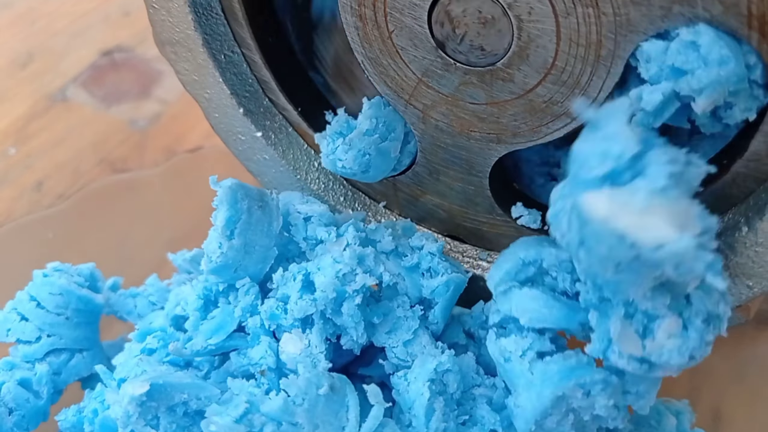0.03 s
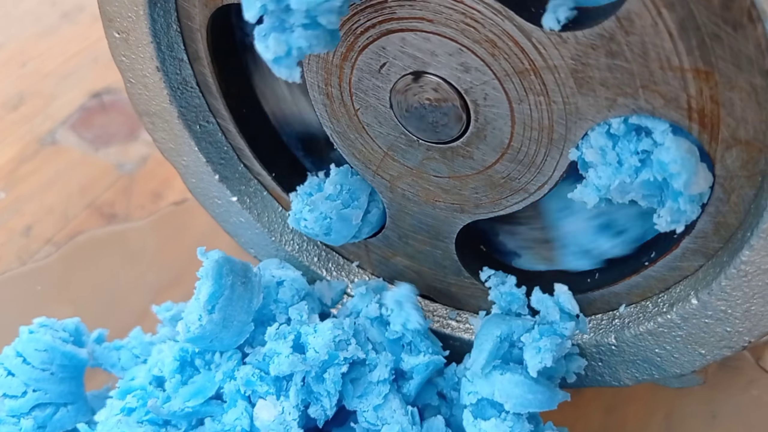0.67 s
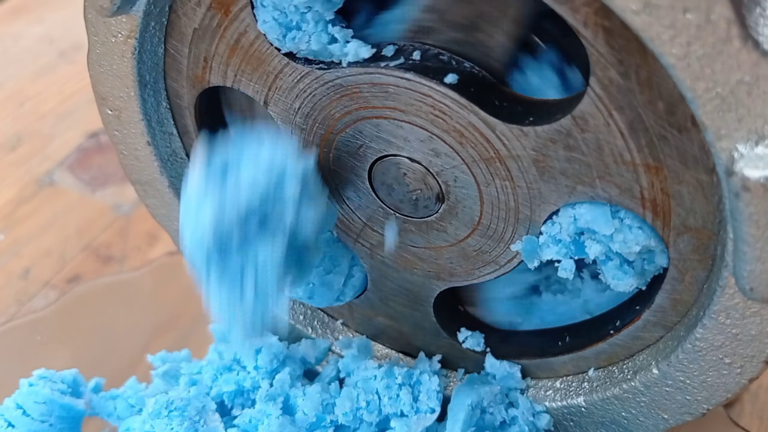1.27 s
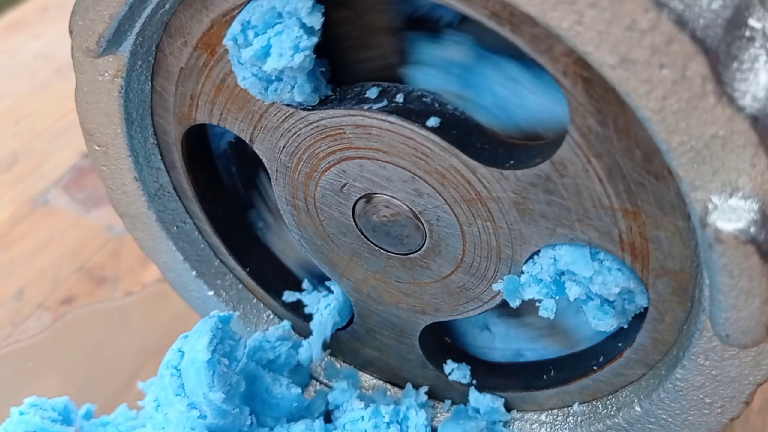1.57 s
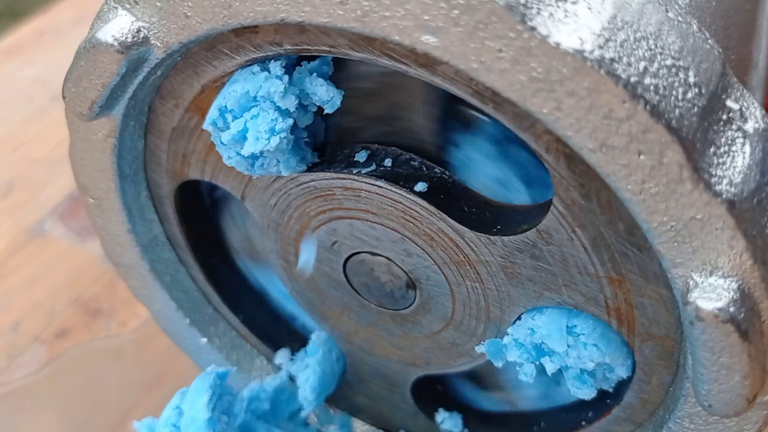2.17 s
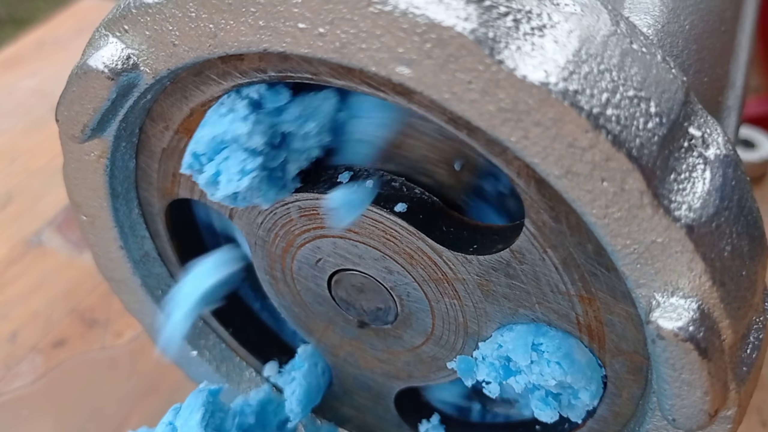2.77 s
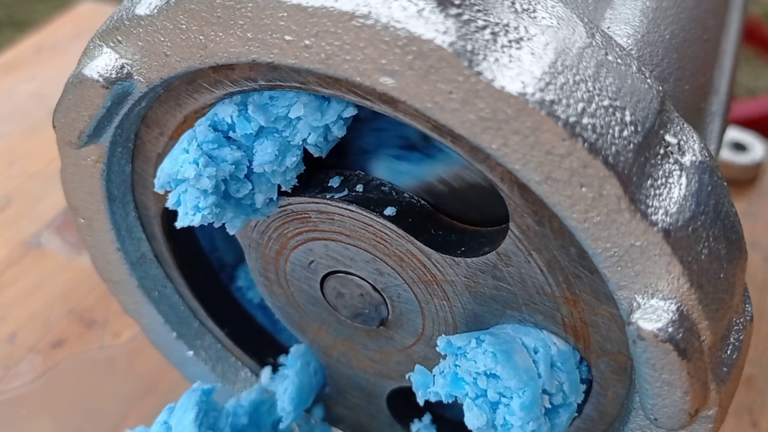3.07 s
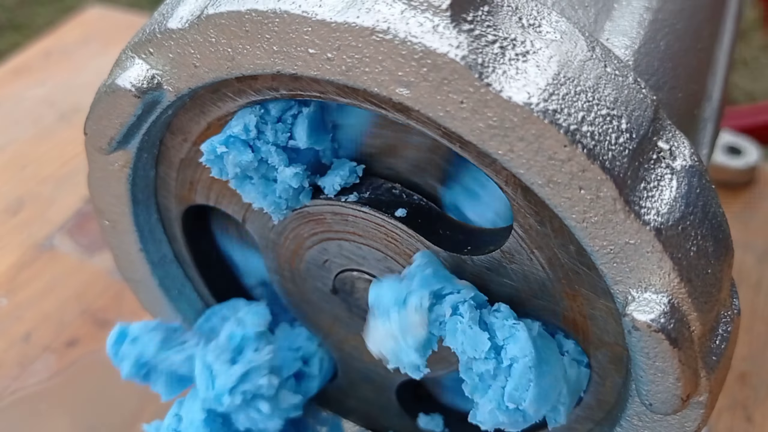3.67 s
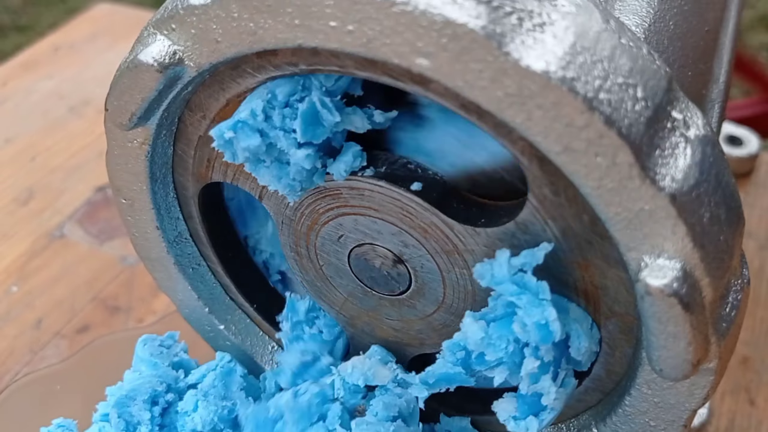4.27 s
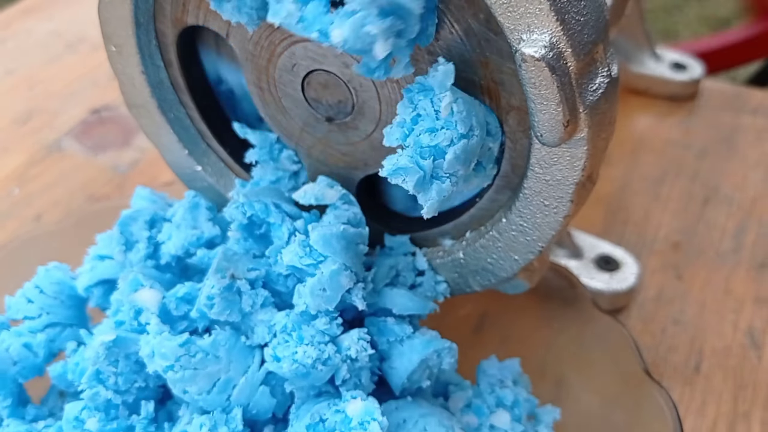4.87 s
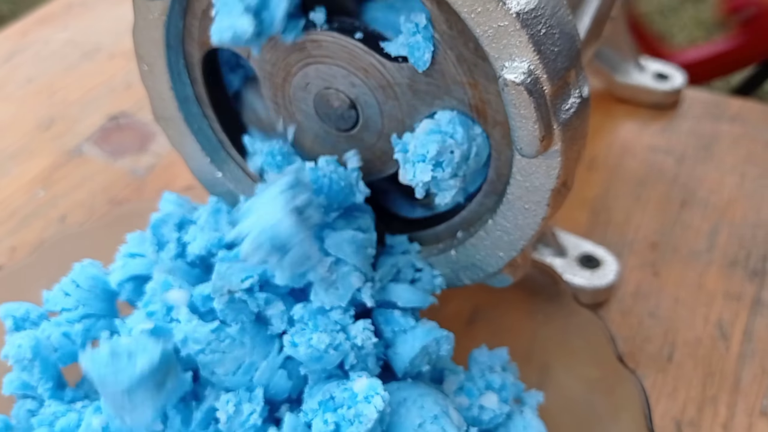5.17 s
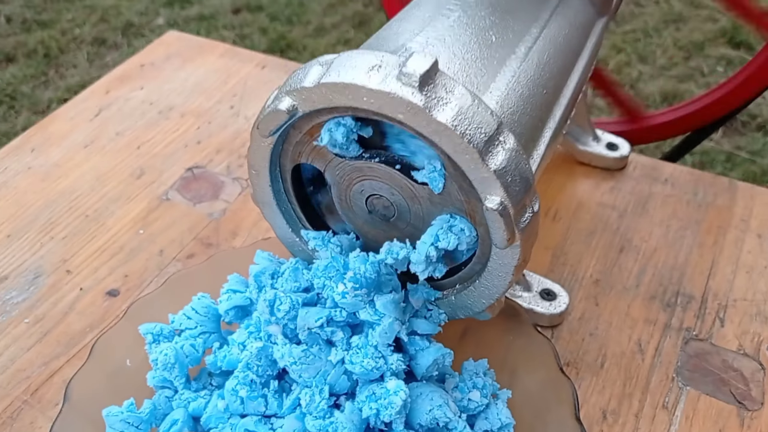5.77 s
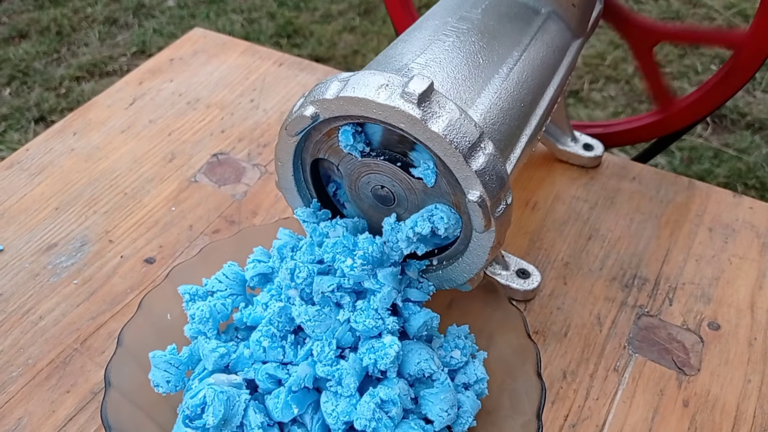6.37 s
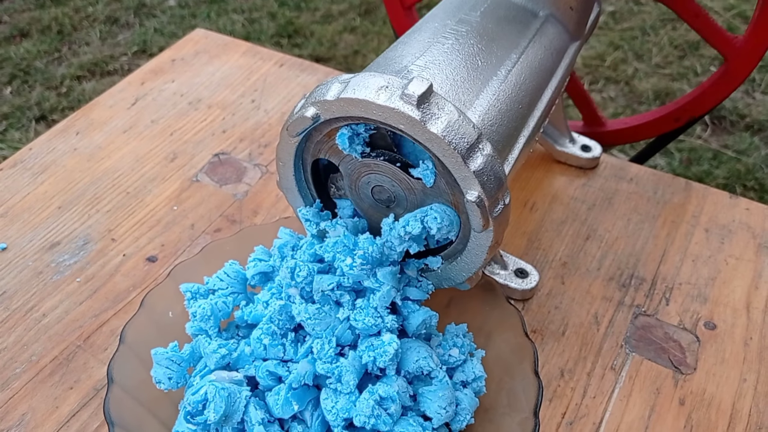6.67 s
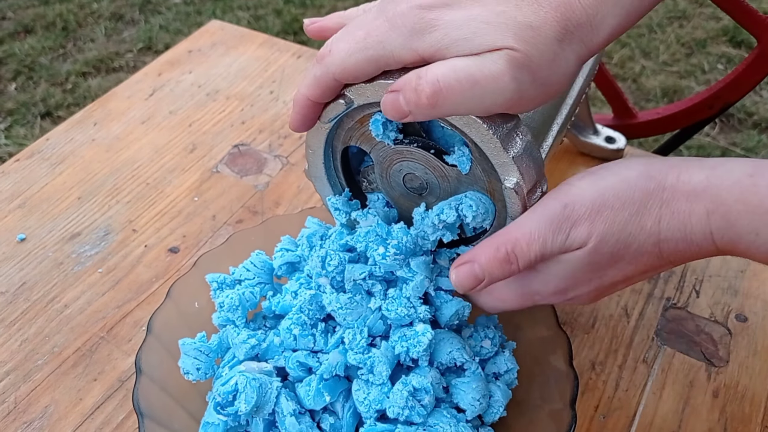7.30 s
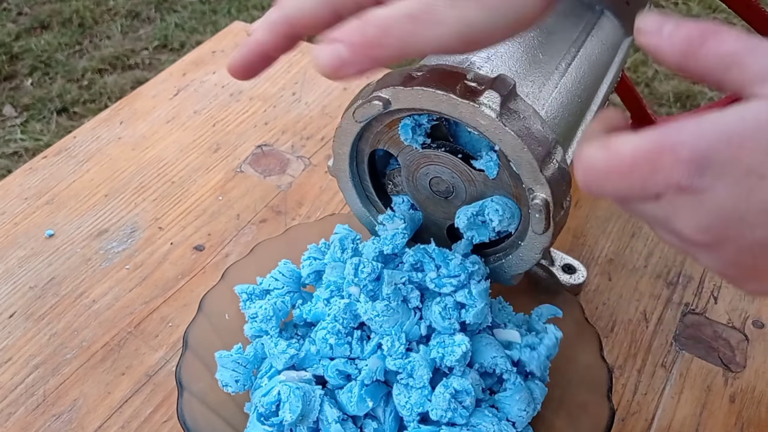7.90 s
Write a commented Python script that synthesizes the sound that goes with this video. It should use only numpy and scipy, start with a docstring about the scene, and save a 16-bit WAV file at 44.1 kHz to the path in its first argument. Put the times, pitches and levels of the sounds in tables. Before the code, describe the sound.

Heard up close in the open air, a meat grinder gives a loud, rattling drone with fast belt ticks, a faint high wavering whine and irregular thuds as it crushes crumbly lumps. After about six seconds a sharp switch click cuts the motor and it winds down at once. A quiet pause follows, then faint finger rubbing, a few small rising squeaks and one clink from the metal ring.

```python
"""A belt-driven meat grinder chews crumbly lumps, heard up close on a wooden table outdoors.
Its gears drone and rattle the frame, the knife rasps on a singing plate, the belt hisses and ticks,
the mass churns and lumps knock in the barrel. A switch snaps and the machine runs down.
Hands then scrape at the head and the pile, and the head's ring squeaks and clinks in the quiet air."""
import sys
import numpy as np
from scipy import signal
from scipy.fft import rfft, irfft
from scipy.io import wavfile
from scipy.ndimage import uniform_filter1d

SR = 44100
rng = np.random.default_rng(int(sys.argv[2]) if len(sys.argv) > 2 else 0)


def store_wav(level_fs):
    """Save 16-bit WAV to argv[1]."""
    pcm = np.round(np.clip(np.atleast_2d(level_fs), -1, 1) * 32767)
    wavfile.write(sys.argv[1], SR, pcm.T.astype(np.int16))


N = 358974
TIME = np.arange(N) / SR
HIT_SIZE = 8192  # samples in a one-shot

# The mix of the running machine. Each row: time in seconds, body level in dB,
# panel buzz against the frame rattle in dB, belt level in dB.
MACHINE_MIX = [(0, -28, -17, -50.5), (0.9, -28, -15, -51.5), (2.4, -29.5, -10.5, -51.5),
               (3.3, -29.5, -14, -53), (4.4, -29, -12, -53.5), (5.6, -31, -12.5, -52.5),
               (6.3, -31.5, -16.5, -54)]
# The gear drone. Each row: multiple of the mesh rate, relative level in dB.
GEAR_TONES = [(4, -9), (5, -13.5), (9, -12.5), (18, -29)]
# The motor hum. Each row: pitch in Hz, relative level in dB.
MOTOR_TONES = [(48.8, -27), (73.3, -17.5), (172, -16.5), (300, -14), (600, -11), (899, -30), (1735, -34)]
# The plate sings, breaks into two rough side tones, then sings out again. Each row: time in seconds,
# pitch in Hz, whine level in dB, distance to the side tones in Hz, their level in dB.
PLATE_SONG = [(0, 2563, -52, 89.7, -57), (1.2, 2552, -53, 90.5, -53.5), (1.8, 2557, -46, 89.7, -64),
              (2.3, 2543, -51.5, 90, -54), (2.75, 2544, -46.5, 89.4, -56), (3.2, 2533, -51, 90, -52),
              (3.95, 2553, -48, 104.2, -52), (4.4, 2560, -48, 114, -52), (4.7, 2580, -55, 139.7, -48),
              (5.3, 2530, -58, 198, -48), (5.5, 2530, -43.5, 178.4, -48), (5.8, 2536, -46, 100.4, -58),
              (5.98, 2548, -41.5, 89.2, -58), (6.24, 2580, -43.5, 70, -46), (6.36, 2540, -45.5, 80, -53.5)]
# The belt's pace under power. Each row: time in seconds, turns per second.
BELT_SPEED = [(0, 4.406), (1.5, 4.431), (2.5, 4.41), (3, 4.35), (3.3, 4.231), (3.7, 4.302), (4.6, 4.354),
              (5.5, 4.34), (6.3, 4.472)]
# Rough spots on the belt. Each row: place in the turn from 0 to 1, relative level in dB.
BELT_SPOTS = [(0, -3), (.048, -16), (.18, -9.5), (.258, -6.5), (.43, -6.5), (.497, -4.5), (.54, -18),
              (.67, -6), (.742, -7), (.93, -9.5)]
# The belt's top end fades as the microphone draws back. Each row: time in seconds, gain in dB.
BELT_TREBLE = [(0, 0.5), (2.6, -1), (3.4, 0.5), (4.6, -1), (5.3, -3.5), (5.9, -11)]
# Lumps caught by the auger. Each row: start in seconds, peak in dB, centre of the blow in Hz,
# crack against the thud in dB, crushing time in seconds.
LUMPS = [(.089, -18.5, 561, -19, 0.073), (.148, -18, 640, -16, .008), (.279, -7, 417, -23, 0.022),
         (.732, -13.5, 493, -26, 0.0097), (.747, -19.5, 897, -10, 0.017), (.794, -16, 136, -26, 0.013),
         (1.038, -19.5, 490, -26, 0.039), (1.075, -17, 168, -22, 0.014), (1.183, -12.5, 683, -10, 0.0073),
         (1.250, -16, 142, -23, 0.012), (1.484, -18.5, 134.6, -25, 0.021), (1.596, -16.5, 910, -19, 0.005),
         (1.728, -20.5, 182.6, -26, 0.034), (1.904, -16, 164.5, -21, 0.033), (1.934, -30, 850, -20, 0.0069),
         (2.110, -7, 524, -18.5, .011), (2.184, -21, 617, -17, 0.018), (2.334, -17.5, 297, -27, 0.014),
         (2.362, -17.5, 577, -12.5, 0.0097), (2.442, -18.5, 197, -25, 0.015), (2.5050, -6, 448, -31, 0.014),
         (2.555, -11.5, 734, -15, 0.0064), (2.630, -20.5, 513, -11, 0.012), (2.768, -7, 627, -11, 0.0076),
         (2.780, -13.5, 170, -25.5, 0.015), (3.005, -17, 505, -34, .016), (3.332, -23, 590, -24, 0.0073),
         (3.702, -19.5, 488, -26, 0.03), (3.722, -23, 700, -7, .012), (4.244, -19, 554, -27, 0.0054),
         (4.415, -16, 463, -34.5, 0.023), (4.669, -17, 234.5, -23, 0.035), (5.084, -15.5, 520, -15, 0.0081),
         (5.146, -17.5, 205, -37, 0.017), (5.180, -21, 602, -24, 0.012), (5.293, -14, 460, -35, 0.017),
         (5.328, -23, 647, -29, 0.011), (5.564, -15.5, 551, -16, 0.027), (5.58, -19, 189.7, -32, 0.042),
         (5.917, -16, 628, -24, 0.0082), (5.92, -20, 180, -33, 0.031), (5.992, -13.5, 560, -27, 0.0067),
         (6.269, -22, 148.4, -19.5, 0.02)]
# Hard belt snaps and small metal clicks. Each row: start in seconds, peak in dB, centre in Hz.
CLICKS = [(.148, -25.5, 2700), (.2615, -37, 6800), (1.166, -34, 3810), (1.394, -33, 3770),
          (1.4042, -33, 3600), (1.630, -30.5, 3600), (1.7315, -28.5, 3710), (1.8432, -35, 5400),
          (1.856, -25.5, 3800), (2.1825, -24, 3470), (2.2957, -33.5, 3210), (2.307, -30, 4997),
          (3.448, -33, 3100), (4.527, -39, 6530), (7.04, -65.5, 10980), (7.502, -50, 6640),
          (7.663, -53, 6000)]
# The switch snaps, bounces and drops into its seat. Each row: start in seconds, peak in dB.
SWITCH_HITS = [(6.3638, -11.5), (6.375, -26.5), (6.391, -37), (6.405, -36), (6.4327, -27)]
# Fingers scrape at the head and the pile. Each row: start in seconds, length in seconds,
# level in dB, attack in seconds, resonance of the contact in Hz.
SCRAPES = [(7.741, 0.016, -41.5, 0.015, 2700), (7.807, 0.079, -50.5, 0.027, 895),
           (7.902, 0.037, -59, .015, 850), (7.95, .008, -42.5, .006, 230),
           (7.961, 0.035, -41.5, 0.011, 2500), (8.006, 0.053, -49, .01, 623),
           (8.063, 0.035, -46, 0.011, 850), (8.098, 0.021, -41, 0.0071, 1050)]
# Skin slides on metal. Each row: start in seconds, length in seconds, level in dB.
RUBS = [(7.08, 0.13, -77), (7.28, 0.17, -72.5), (7.555, 0.12, -76.5), (7.81, 0.42, -61)]
# The ring's thread squeaks. Each row: start in seconds, length in seconds, peak in dB, first pitch in Hz.
SQUEAKS = [(7.827, 0.06, -45.5, 3380), (7.972, 0.042, -37, 3580), (8.003, 0.031, -40.5, 3780),
           (8.072, .035, -46, 4000)]
# The voice of a squeak. Each row: multiple of its pitch, relative level in dB.
SQUEAK_PARTIALS = [(.62, -1), (.76, -8), (1, 3), (1.09, -3), (2.5, -14)]
# Echoes off the table top and the machine's body. Each row: delay in seconds, gain in dB.
ECHOES = [(.0019, -22), (.0034, -19), (.0053, -19), (.0087, -19), (.0131, -19)]

# How each part rings. Each row: centre in Hz, width in Hz, gain in dB.
FRAME_MODES = [(106, 18, -6), (137, 25, 3), (174.4, 19, -3), (195.7, 36, 3.5), (248.8, 24, 3.5),
               (311.8, 33, 3.5), (347.6, 18, 1), (476, 66, -1), (524.7, 39.6, 1.5), (559.4, 14, -1),
               (621.3, 25.5, 4), (668, 19, -10.5), (679, 80, -4.5), (741, 96, -18.5), (845, 93, -9.5),
               (926, 25, -11.5), (1009, 20, -11.5), (1140, 10, -19.5)]  # frame and table together
PANEL_MODES = [(1053, 20, 9.5), (1137.6, 19, 7), (1308, 22, 0.5)]
PLATE_MODES = [(2170, 700, -4), (2184, 70, -12.5), (2545, 260, -4.5), (2900, 180, -24)]  # knife and plate together
BARREL_MODES = [(350, 39.5, 7), (483, 47, 5), (510, 28.2, -9.5)]
HEAD_MODES = [(2500, 220, 1), (3520, 83, -15.5), (3850, 63, 0.5), (4550, 90, 0.5), (5080, 99, 3),
              (5360, 120, -0.5), (5770, 74, -8), (6290, 91, -9.5), (6660, 190, 2), (7670, 49, -7.5),
              (9150, 140, -9.5)]
SWITCH_MODES = [(1960, 22, -2), (2260, 29, 2), (2430, 27, 0), (3190, 61, -5.5), (4900, 35, -1),
                (5600, 41, 2), (6480, 68, 0.5), (7710, 24, 3)]  # its metal housing
RING_MODES = [(617, 25, 4), (1740, 60, -2), (2280, 41, 0), (2740, 31, -1), (6060, 44, -5), (6500, 45, -4),
              (9660, 40, -20)]  # the head's threaded ring
CLINK_MODES = [(900, 300, -5), (2160, 150, 4), (4350, 250, -5), (5270, 330, 3), (6270, 130, 8),
               (11500, 300, -10)]  # the loose ring against the head

# The tone colour of each sound, as an EQ curve. Each row: frequency in Hz, gain in dB.
HISS_EQ = [(1760, -16), (3000, -2), (3830, -4), (4260, -6.5), (5250, -5.5), (5800, -4.5), (6620, -7),
           (7780, -14.5), (9530, -16.5), (11100, -23), (13200, -37), (15100, -30.5), (16000, -40.5)]
TICK_EQ = [(1500, -25), (3400, 7), (4500, 0), (6600, 3), (7800, -6.5), (9300, -9), (11500, -19),
           (13500, -30), (15500, -22.5)]
CLICK_EQ = [(800, -17.5), (1500, -8.5), (2200, 4), (3000, 5), (3800, 1), (4800, -3.5), (6300, -1.5),
            (8000, -9.5), (9200, -4), (11000, -16.5), (13500, -21), (15500, -18.5)]
SWITCH_EQ = [(600, -9.5), (1500, -2.5), (2100, 6.5), (3000, 4.5), (3900, -11.5), (5000, 0), (6400, -0.5),
             (8000, -11), (9300, -8), (11500, -19), (15500, -20.5)]
SCRAPE_EQ = [(35, -53), (60, -27), (133, 3), (398, -0.5), (480, 7), (682, -10), (1040, 0), (1250, -6),
             (2300, -4.5), (3120, -12), (4640, -20), (6280, -14), (7940, -33), (9350, -26), (16000, -60)]
AIR_EQ = [(18, -55), (30, -27.5), (95, -10), (120, -7), (137, 2), (156, -2.5), (373, -25.5), (806, -23.5),
          (1420, -23), (1740, -18.5), (2260, -14), (3490, -32.5), (5550, -37.5), (9040, -56.5),
          (14000, -50)]

MESH_HZ, MESH_WANDER = 63.06, 0.00498  # gear teeth meeting; the wander is a share of that rate
SWITCH_OFF_S, RUN_DOWN_S = 6.3644, .425  # friction brakes the machine evenly to a halt
FIRST_TICK_S, CLINK_S = .0344, 8.0494
JOINT_PLACE, SQUEEZE_PLACE = .494, 0.24  # places in the belt's turn, 0-1
TICK_DB, JOINT_DB, TICK_SPREAD_DB = 19, 12.5, 2.5  # peaks against the hiss, and their spread
SQUEAK_RISE_HZ_PER_S = 6300


def drone(mesh):
    """Gear and motor tones swell and sag with the load and die when the power is cut."""
    gears = motor = 0
    for multiple, db in GEAR_TONES:
        level = undb(db + 3 * np.tanh(wander(14)))
        gears += level * np.sin(2 * np.pi * multiple * mesh + .5 * wander(14))
    for hz, db in MOTOR_TONES:
        level = undb(db + 2 * wander(5))
        motor += level * np.sin(2 * np.pi * hz * TIME + .6 * wander(6.6))
    return gears * power_fade(fade_s=0.16) + motor * power_fade(fade_s=0.098)


def rattle(mesh, speed):
    """Loose teeth and crushed crumbs shake the frame and its panels, hardest once per mesh cycle."""
    tooth_pulse = 1.2 + np.exp(-(mesh % 1) / 0.45)
    push = grains(per_s=2000, spread_db=2.5) * tooth_pulse * undb(1.1 * wander(16))
    frame = band(resonate(push, FRAME_MODES), 70, 1190)
    frame = unit(band(frame, 23, 1416, order=6))
    panels = unit(band(resonate(push, PANEL_MODES), 780, 1460, order=4))
    panels *= undb(curve(MACHINE_MIX, column=2))
    # contacts soften as the machine slows, and soft contacts reach only the low modes
    soft_share = np.interp(speed, [0, 1], [0.89, 0.081])
    low_modes = band(frame, 206, 290, order=3) * undb(10.5)
    return (1 - soft_share) * (frame + panels) + soft_share * low_modes


def churn(squeeze):
    """The crumbly mass is kneaded against the plate and rumbles in the frame's low modes."""
    crumbs = grains(per_s=500, spread_db=3)
    return unit(band(resonate(crumbs, FRAME_MODES), 85, 230)) * squeeze


def knife(mesh):
    """The knife chatters on the plate in step with the gears, ringing a tone either side of the whine."""
    push = grains(per_s=3000, spread_db=0.5) * (3.5 + np.exp(-(mesh % 1) / 1.7))
    rasp = unit(band(resonate(push, PLATE_MODES), 1100, 3860)) * undb(-45.5 - 0.95 * wander(1.5))
    pitch, offset = curve(PLATE_SONG), curve(PLATE_SONG, column=3)
    sides = sum(glide(push, hz, width_hz=110) for hz in (pitch - offset, pitch + offset))
    return rasp + unit(band(sides, 2000, 2880)) * undb(curve(PLATE_SONG, column=4))


def whine(mesh):
    """The plate sings: a fine wavering tone in short swells, shaken once per mesh cycle."""
    pitch = curve(PLATE_SONG) * (1 + .004 * wander(22))
    tone = np.sin(2 * np.pi * np.cumsum(pitch) / SR + .35 * wander(130))
    swells = undb(4.5 * np.tanh(wander(42)))
    tremolo = 1 + 0.59 * np.cos(2 * np.pi * mesh)
    return unit(tone * tremolo * swells) * undb(curve(PLATE_SONG, column=2))


def knocks():
    """A lump jams and is crushed: a blow and ever weaker slips thud in frame and barrel, with a crack."""
    out = np.zeros(N)
    small_lumps = [(*lump, -22, 0.0095) for lump in scatter(per_s=2.2, db=-20.5, hz=269.4)]
    for s, db, hz, crack_db, crush_s in list(LUMPS) + small_lumps:
        # the slips lock loosely to the swing of the frame
        gaps = (np.ceil(.003 * hz) + rng.uniform(-0.27, .25, size=14)) / hz
        slips = np.cumsum(gaps) - gaps[0]
        blow = np.zeros(HIT_SIZE)
        blow[(slips * SR).astype(int) % HIT_SIZE] = np.exp(-(slips / crush_s) ** 1.32)
        push = resonate(blow, [(hz, 0.88 * hz, 0)])
        thud = band(resonate(push, FRAME_MODES) + undb(-2) * resonate(push, BARREL_MODES), 56, 1075)
        crack = band(burst(t60=0.054), 740, 2150, order=3)
        add(out, s, unit(thud) + undb(crack_db) * unit(crack), db)
    return out


def belt_hiss():
    """Sliding belt and metal make a fine, fluttering hiss."""
    friction = colour(grains(per_s=6000, spread_db=2), HISS_EQ)
    return unit(echo(cast_head(friction, ring_db=-13))) * undb(1.2 * wander(16))


def belt_ticks(turns):
    """Each rough spot of the belt ticks on the pulley once a turn, and its joint adds a bright snap."""
    def passes(place):
        return np.searchsorted(turns, np.arange(place, turns[-1])) / SR

    out = np.zeros(N)
    for s in passes(JOINT_PLACE):
        snap = band(colour(burst(t60=0.0033), TICK_EQ), 8257, 10530)
        add(out, s, snap, JOINT_DB + TICK_SPREAD_DB * rng.standard_normal())
    for place, db in BELT_SPOTS:
        for s in passes(place):
            tint = [(hz, gain + 5 * rng.standard_normal()) for hz, gain in TICK_EQ]  # no two alike
            contact = burst(t60=0.0069) + undb(-2) * burst(t60=0.078)
            tick = echo(cast_head(colour(contact, tint), ring_db=-1.5))
            add(out, s, tick, TICK_DB + db + TICK_SPREAD_DB * rng.standard_normal())
    return out


def belt_treble(belt):
    """Ride the belt's top end, which dulls as the microphone draws back."""
    top = signal.sosfiltfilt(signal.butter(2, 7000, "high", fs=SR, output="sos"), belt)
    return belt + (undb(curve(BELT_TREBLE)) - 1) * top


def clicks():
    """Belt, metal and tearing crumbs snap with a faint metallic tail; hard snaps can open up brighter."""
    out = np.zeros(N)
    crumbs = scatter(per_s=5.9, db=-40.5, hz=3800)
    for s, db, hz in list(CLICKS) + crumbs:
        contact = burst(t60=0.02) + undb(-30.5) * burst(t60=0.21)
        snap = echo(cast_head(colour(contact, CLICK_EQ), ring_db=1.5))
        top_hz = max(7500, 2 * hz * undb(0.16 * (db + 26)))
        add(out, s, band(resonate(snap, [(hz, 1.2 * hz, 0)]), 660, top_hz), db)
    return out


def cast_head(contact, ring_db):
    """The cast head adds its bright ringing to a contact."""
    return contact + undb(ring_db) * resonate(contact, HEAD_MODES)


def switch():
    """The switch chatters: each contact rings its housing, leaves a duller tail and thumps the frame."""
    out = np.zeros(N)
    for s, db in SWITCH_HITS:
        tail = undb(-22.5) * band(burst(t60=.3), 500, 9000, order=1)
        snap = colour(burst(t60=0.016) + tail, SWITCH_EQ)
        add(out, s, echo(snap + resonate(snap, SWITCH_MODES)), db)
        thump = band(resonate(burst(t60=.02), FRAME_MODES), 100, 380)
        add(out, s, thump, db - 12)
    return out


def hands():
    """Gritty finger friction rings metal and frame, each grip with its own resonance, and skin hisses."""
    grit = grains(per_s=5000, spread_db=2)
    scrape = unit(band(echo(colour(grit, SCRAPE_EQ)), 100, 15800))
    scrape += undb(-5.5) * unit(resonate(grit, RING_MODES))
    scrape += undb(-18) * unit(band(resonate(grit, FRAME_MODES), 330, 1200))
    scrape += undb(-24) * unit(resonate(grit, PANEL_MODES))
    scrape += undb(-37) * unit(band(grit, 7500, 12000, order=4))
    grips = 0
    for s, length, db, attack, hz in SCRAPES:
        grip = unit(scrape + resonate(scrape, [(hz, 0.34 * hz, -4)]))
        rise = np.clip((TIME - s) / attack, 0, 1)
        release = np.exp(-np.maximum(TIME - s - length, 0) / 0.013)
        grips += undb(db) * grip * rise * release
    skin = unit(echo(band(grains(per_s=3300, spread_db=3.5), 3700, 6100, order=3)))
    return grips + skin * sum(undb(db) * swell(TIME - s, length) for s, length, db in RUBS)


def threaded_ring():
    """The head's ring is turned: its thread squeaks upwards and the loose ring clinks once."""
    out, age = np.zeros(N), TIME[:HIT_SIZE]
    for s, length, db, hz in SQUEAKS:
        pitch = hz + SQUEAK_RISE_HZ_PER_S * np.minimum(age, length)
        friction = rng.standard_normal(HIT_SIZE)
        tones = sum(undb(gain) * glide(friction, k * pitch, width_hz=75) for k, gain in SQUEAK_PARTIALS)
        sheen = undb(-8) * unit(band(resonate(friction, HEAD_MODES), 6280, 6370))
        add(out, s, (unit(tones) + sheen) * swell(age, length), db)
    clink = band(resonate(burst(t60=0.026), CLINK_MODES), 300, 7500, order=1)
    add(out, CLINK_S, clink, db=-22.5)
    return out


def open_air():
    """A quiet outdoor bed: a wavering rumble under a faint, nearly even rustle."""
    rumble, rustle = (unit(colour(rng.standard_normal(N), AIR_EQ)) for _ in range(2))
    low = band(rumble, 22, 450) * undb(1.6 * wander(27))
    high = band(rustle, 450, 11000) * undb(0.3 * wander(4.7))
    return (low + high) * undb(-60.5)


def undb(db):
    """Decibels to gain."""
    return 10 ** (np.asarray(db) / 20)


def unit(x):
    """Scale to rms 1."""
    return x / np.sqrt(np.mean(x ** 2))


def curve(rows, column=1):
    """One column of a table, joined by straight lines in time."""
    rows = np.array(rows, float)
    return np.interp(TIME, rows[:, 0], rows[:, column])


def swell(age, length):
    """Envelope that rises and falls smoothly."""
    return np.sin(np.pi * np.clip(age / length, 0, 1)) ** 2


def power_fade(fade_s):
    """Full level until the power is cut, then dying away."""
    return np.exp(-np.maximum(TIME - SWITCH_OFF_S, 0) / fade_s)


def wander(per_s):
    """Smooth random drift with an rms of 1."""
    hold = max(int(SR / per_s), 2)
    steps = np.repeat(rng.standard_normal(N // hold + 1), hold)
    return unit(uniform_filter1d(uniform_filter1d(steps, hold), hold)[:N])


def grains(per_s, spread_db):
    """Tiny contacts at random moments and of uneven size."""
    contacts = (rng.random(N) < per_s / SR) * rng.choice([-1, 1], N)
    return unit(contacts * undb(spread_db * rng.standard_normal(N)))


def burst(t60):
    """Noise with a fast attack that falls 60 dB in t60 seconds."""
    age = TIME[:HIT_SIZE]
    attack = 1 - np.exp(-age / 0.00061)
    return rng.standard_normal(HIT_SIZE) * np.exp(-np.log(1000) * age / t60) * attack


def scatter(per_s, db, hz):
    """Random small hits while the power is on. Each row: start in seconds, peak in dB, centre in Hz."""
    gap, strength, pitch = rng.random((60, 3)).T
    starts = np.cumsum(.3 + 1.4 * gap) / per_s
    hits = zip(starts, db + 6 * (strength - .5), hz * 2 ** (1.6 * (pitch - .5)))
    return [hit for hit in hits if hit[0] < SWITCH_OFF_S]


def resonate(x, modes):
    """Sound through parallel resonances."""
    out = 0
    for hz, width, db in modes:
        peak = signal.iirpeak(min(hz, SR / 3), hz / min(width, SR / 3), fs=SR)
        out += undb(db) * signal.lfilter(*peak, x)
    return out


def glide(x, hz, width_hz):
    """Sound through one resonance whose centre moves."""
    carrier = np.exp(2j * np.pi * np.cumsum(hz) / SR)
    pole = np.exp(-np.pi * width_hz / SR)
    return 2 * np.real(carrier * signal.lfilter([1 - pole], [1, -pole], x / carrier))


def colour(x, eq):
    """Minimum-phase EQ, which keeps attacks sharp."""
    hz, db = np.transpose(eq)
    size = HIT_SIZE // 2
    bin_hz = np.arange(size // 2 + 1) * SR / size
    log_gain = np.log(undb(np.interp(np.log(bin_hz + 1), np.log(hz), db)))
    cepstrum = irfft(log_gain)[:size // 2]
    cepstrum[1:] *= 2
    return signal.fftconvolve(x, irfft(np.exp(rfft(cepstrum, size))))[:len(x)]


def band(x, low_hz, high_hz, order=2):
    """Butterworth band-pass."""
    edges = [low_hz, min(high_hz, SR / 2 - 1)]
    return signal.sosfilt(signal.butter(order, edges, "band", fs=SR, output="sos"), x)


def echo(x):
    """Short echoes from nearby surfaces comb the sound."""
    return x + sum(undb(db) * np.pad(x, (int(s * SR), 0))[:len(x)] for s, db in ECHOES)


def add(out, s, sound, db):
    """Mix a sound in at time s with the given peak level."""
    start = int(np.clip(s * SR, 0, N - 1))
    out[start:start + len(sound)] += (undb(db) * sound / np.abs(sound).max())[:N - start]


def scene():
    """The mono mix: the running grinder, its stop and the handling after it."""
    speed = np.clip(1 - (TIME - SWITCH_OFF_S) / RUN_DOWN_S, 0, 1)
    mesh = np.cumsum(MESH_HZ * speed * (1 + MESH_WANDER * wander(7))) / SR  # counts teeth meeting
    turns = np.cumsum(curve(BELT_SPEED) * speed) / SR
    turns -= np.interp(FIRST_TICK_S, TIME, turns)
    # the mass is squeezed once a turn, and the frame rattles a little harder meanwhile
    squeeze = np.abs(np.cos(np.pi * (turns - SQUEEZE_PLACE))) ** 2.2
    hiss = belt_hiss()
    shaking = rattle(mesh, speed) * undb(squeeze - .5) + undb(-4.5) * churn(squeeze)
    # in the run-down, rasp and belt fade faster than the body
    body = (shaking + undb(2.5) * drone(mesh)) * undb(curve(MACHINE_MIX)) * speed ** 0.97
    plate = knife(mesh) * speed ** 1.94 + whine(mesh) * power_fade(fade_s=.05)
    belt = belt_treble(hiss + belt_ticks(turns)) * undb(curve(MACHINE_MIX, column=3)) * speed ** 2.2
    handling = hands() + threaded_ring()
    return (body + plate + belt + handling + open_air() + knocks() + clicks() + switch())[None]


def record(dry):
    """A steep low-pass trims the top above 16 kHz."""
    return signal.sosfilt(signal.ellip(8, .2, 70, 16000, fs=SR, output="sos"), dry)


dry = scene()
out = record(dry)
store_wav(out)
```